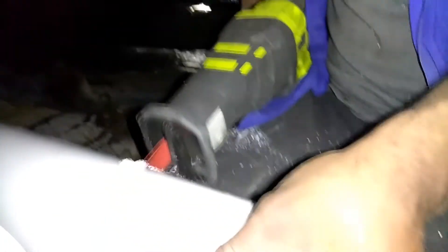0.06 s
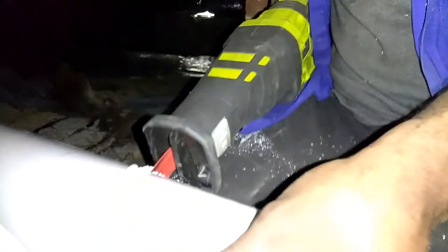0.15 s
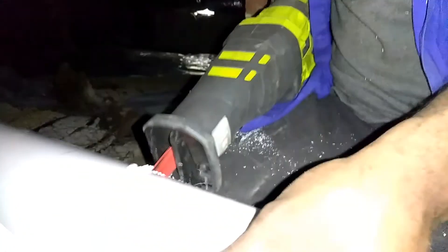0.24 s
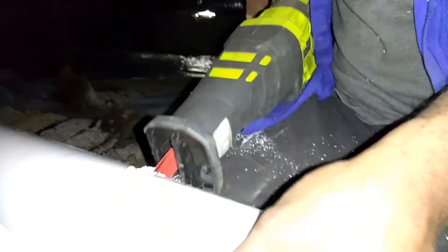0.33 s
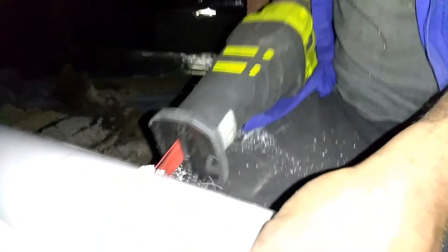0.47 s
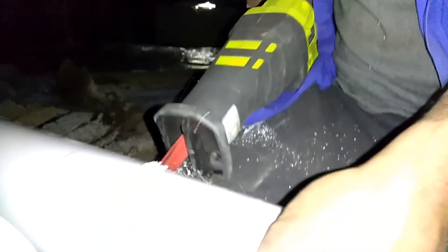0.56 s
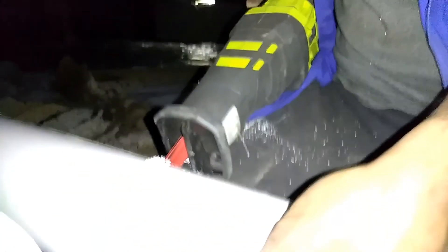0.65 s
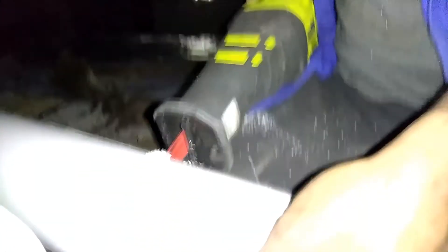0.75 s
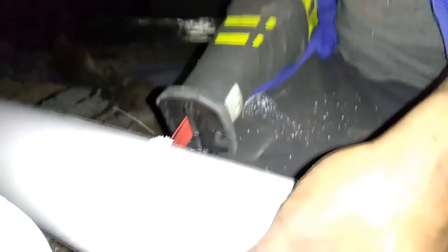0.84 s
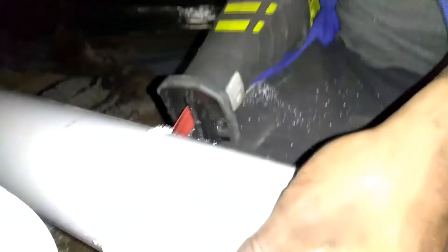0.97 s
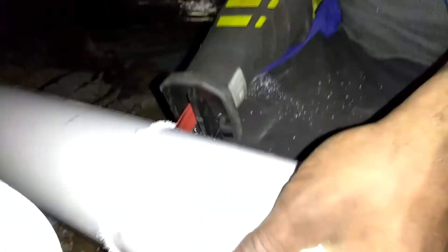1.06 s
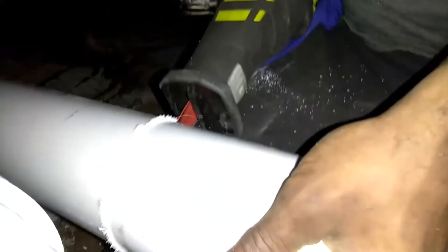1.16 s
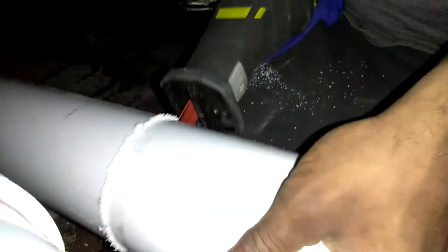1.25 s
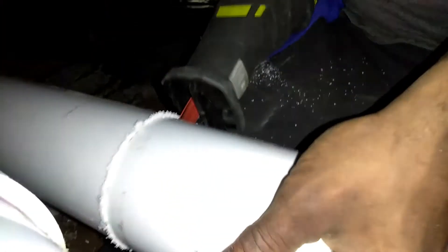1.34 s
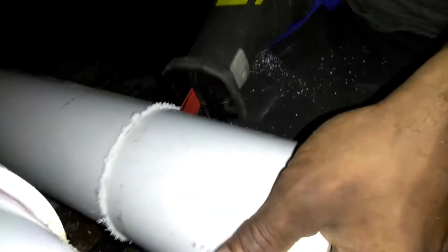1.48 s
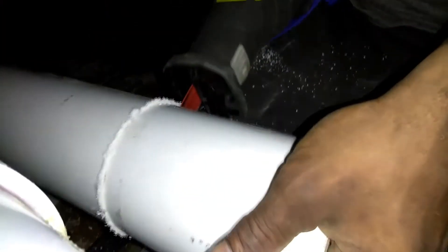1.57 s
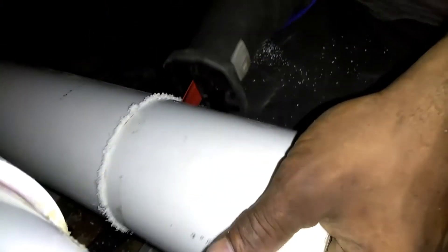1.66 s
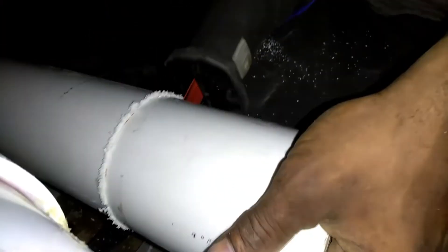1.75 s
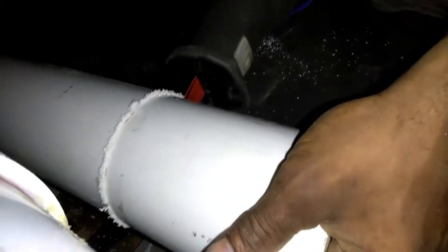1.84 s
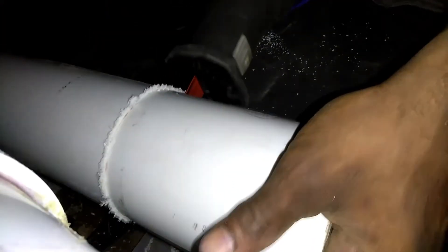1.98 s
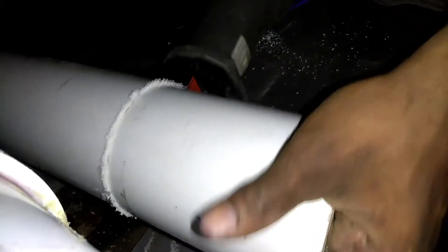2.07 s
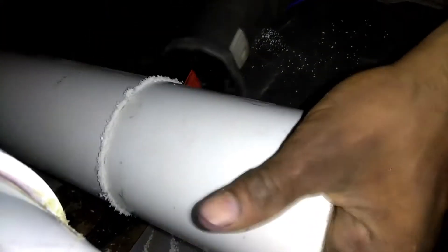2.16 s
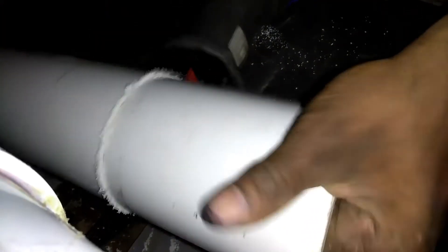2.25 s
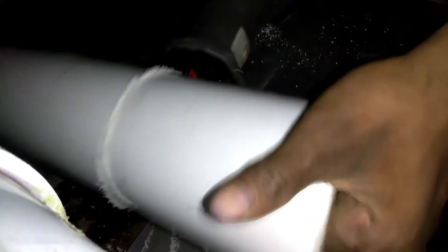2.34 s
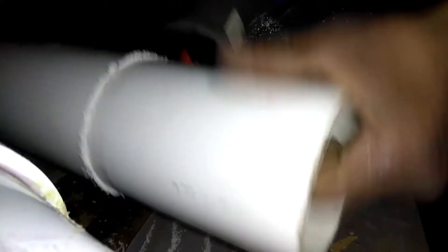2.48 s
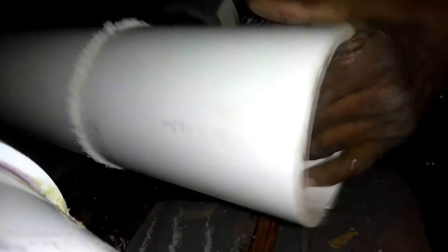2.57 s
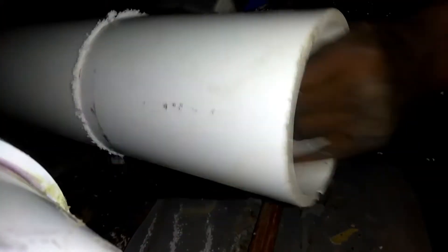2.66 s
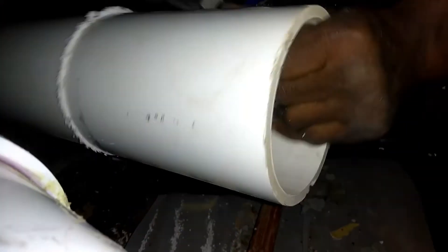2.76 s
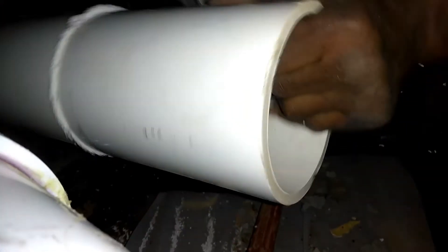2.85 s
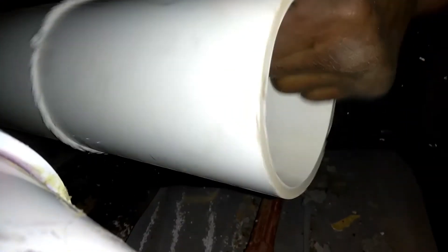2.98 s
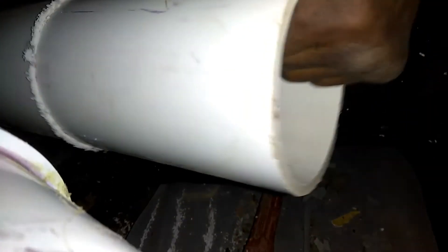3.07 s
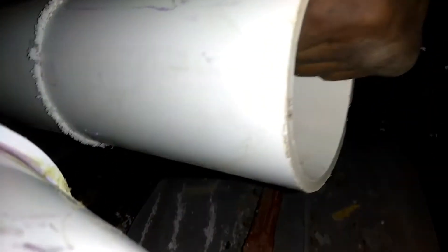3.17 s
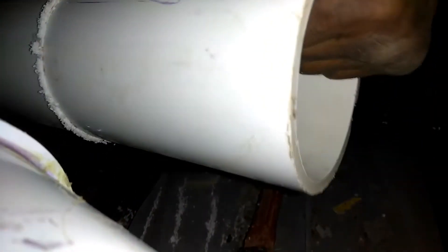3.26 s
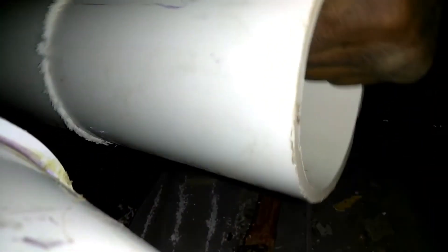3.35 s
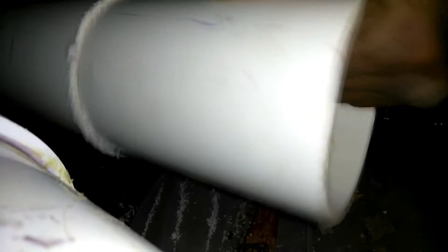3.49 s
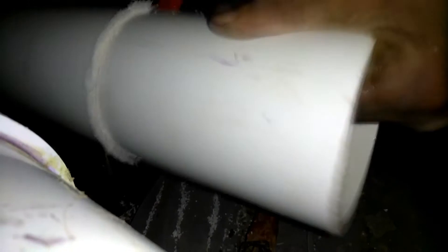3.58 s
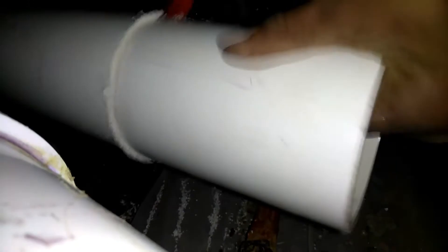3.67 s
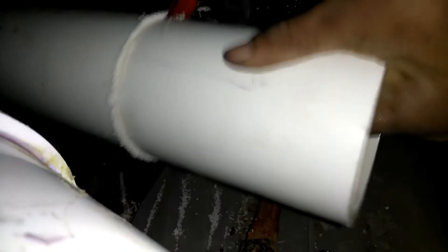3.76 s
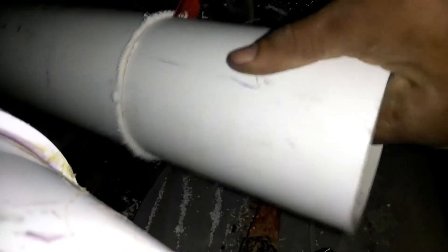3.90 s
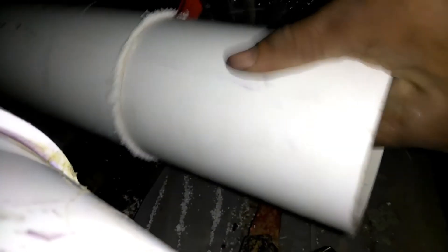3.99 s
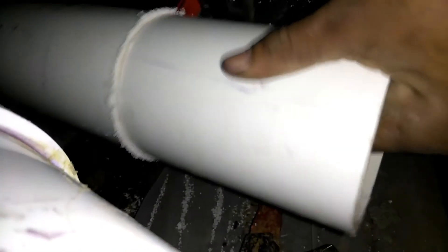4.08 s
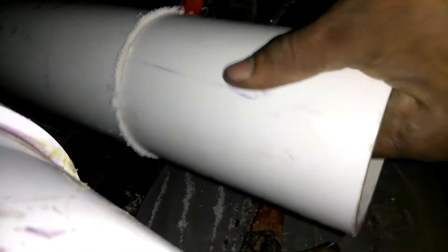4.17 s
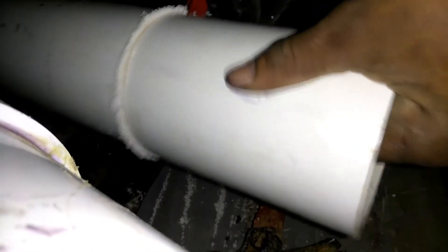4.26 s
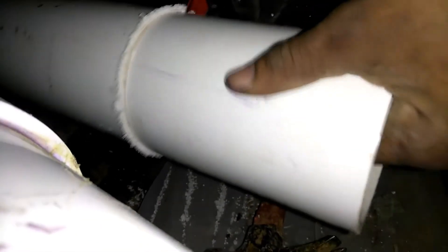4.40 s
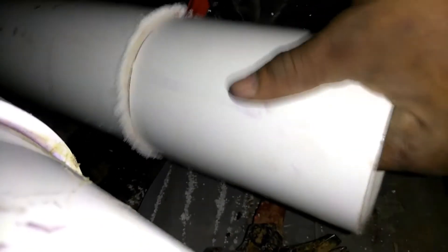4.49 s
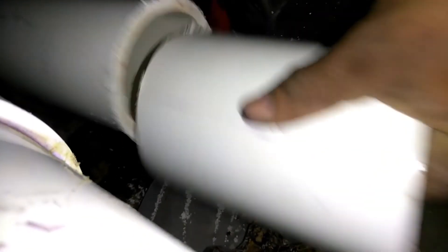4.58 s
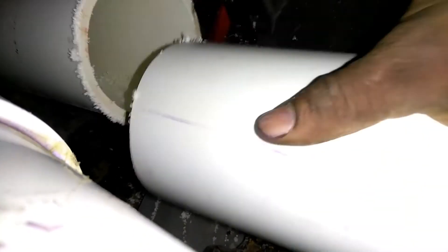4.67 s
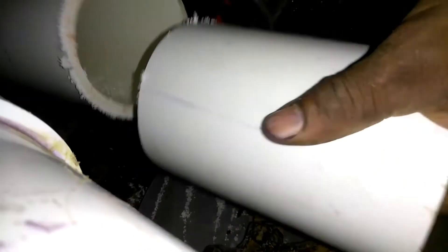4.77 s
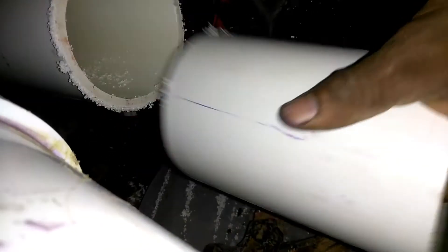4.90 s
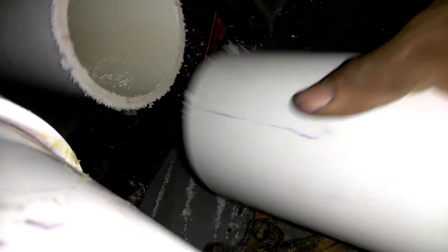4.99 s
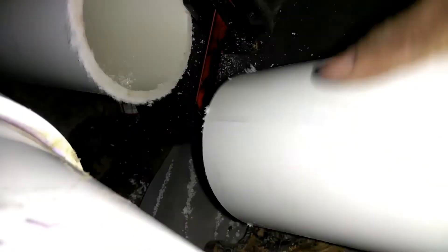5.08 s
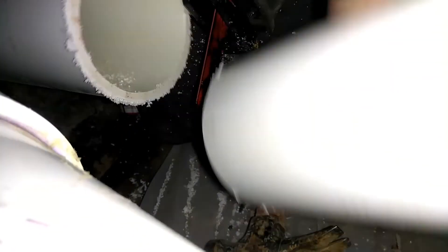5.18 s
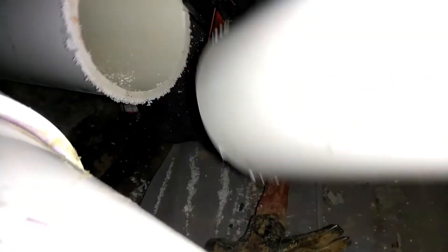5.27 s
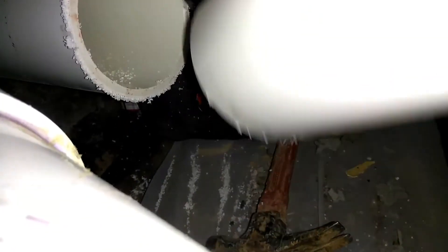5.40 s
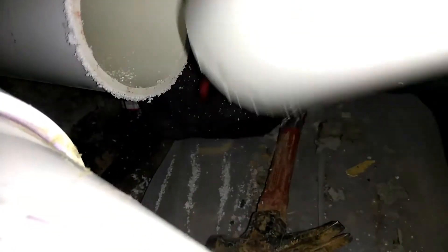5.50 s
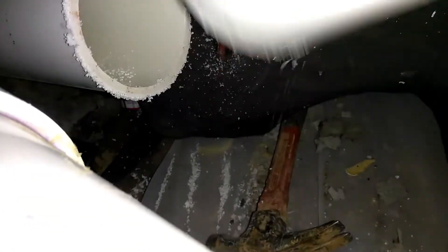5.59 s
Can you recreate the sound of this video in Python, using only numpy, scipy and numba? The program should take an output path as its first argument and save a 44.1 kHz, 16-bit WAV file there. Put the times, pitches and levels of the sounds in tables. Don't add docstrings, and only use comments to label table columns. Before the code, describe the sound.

From 0 s a reciprocating saw is already running at full power, right beside a phone microphone. Its teeth rasp rapidly, about 37 strokes a second, making the wide plastic pipe ring hollow in the low mids, while gears whine and flying chips hiss brightly, mostly on the left. Around 0.65 s the pipe thumps on its rest with a short falling squeal; from about 1 s the rasp eases and hiss and gears stand out. At 2.5 s the trigger is released and the motor stutters down with a few rough catches. Until 3.3 s a hand scuffs and sharply ticks the pipe, and the blade gives a small falling creak near 3.15 s. At 3.3 s the saw restarts abruptly with a squeal and thump, grinding harshly until two low bumps near 4.9 s and shutoff at 5 s. Faint rubs and ticks end it over dull, distant generator rumble.

```python
import sys
import numpy as np
from scipy import signal
from scipy.fft import rfft, irfft
from scipy.io import wavfile
from scipy.ndimage import uniform_filter1d
from numba import njit

SR = 44100
rng = np.random.default_rng(int(sys.argv[2]) if len(sys.argv) > 2 else 0)


def volts(x):
    e = np.asarray(x, float) / 20
    return 10 ** e


def wrap_up_sound(samples):
    columns = np.atleast_2d(samples).T
    tamed = np.clip(columns, -1, 1)
    steps = np.round(tamed * 32767).astype(np.int16)
    wavfile.write(sys.argv[1], SR, steps)


N = 248539
T = np.arange(N) / SR

# on t/s, off t/s, level/dB, coasting fall/(dB/s)
RUNS = [
    (-.1, 2.4784, 1, 165.5),
    (3.308, 4.997, 2, 127.5),
]
# t/s, rate/(strokes/s)
STROKE_RATE = [(0, 37.1), (.5, 37), (.65, 38.6), (.8, 37.6), (1.0, 37.25), (1.55, 37.2), (1.7, 38.2),
               (1.85, 38.5), (2.15, 39.6), (2.3, 33), (2.53, 33), (2.7, 13), (3.3, 15.6), (3.6, 33),
               (3.75, 36.2), (4.6, 36.2), (5.0, 37), (5.4, 24)]
# t/s, feed pressure/dB, blade grip on wall/dB, chip flow/dB, gear load/dB
FEED = [(0, -0.5, 2, -5, 1), (.26, 1, -0.5, -2.5, 1), (.6, -2, 2, -1.5, 1), (.82, 2, 0.5, -1, 2.5),
        (1.03, -9.5, -8, 3, 5), (1.27, -7, 1.5, 4, 5.5), (1.6, -7, 1, 3, 1.5), (1.97, -8, -0.5, 0.5, -4),
        (2.3, -5, -6.5, 2, -0.5), (2.6, -3, 4, -2, -2), (3.34, 4.5, -1.5, 1, -5.5),
        (3.48, -2, -11, -3, 0.5), (3.54, -2.5, 1, -1, 2), (3.95, 4, 1, 0.5, -0.5), (4.55, 2.5, 0, 1.5, 1.5),
        (4.66, -2, -5, 1.5, -0.5), (4.93, 0.5, -3.5, 2.5, -0.5), (5.05, 0.5, -7.5, -1.5, -0.5)]
# t/s, bite depth/(0-1), chip puffing/(0-1)
BITE = [(0, 0.2, .3), (.2, 0.42, .1), (.7, 0.4, .12), (1.3, 0.58, 0.3), (1.55, 0.43, .2), (1.7, 0.44, .5),
        (2.1, 0.37, .3), (2.3, .3, 0.4), (2.55, .25, 0.3), (3.3, .2, 0), (3.6, .3, 0.4), (4.0, .35, 0.4),
        (4.6, 0.21, .3), (5.0, .18, .2), (5.4, 0.2, .3)]
# t/s, jump level/dB, rise/s, fall/s
SNAGS = [(0.0, -0.5, .038, 0.044), (.69, 6, 0.046, 0.096), (1.52, 3.5, 0.051, 0.018),
         (1.7, 2.5, 0.05, 0.24), (2.212, 12, .025, 0.045), (2.267, 3.5, .012, .015),
         (2.34, 12, 0.029, 0.025), (2.4, 5.5, 0.01, .012), (2.425, 8, 0.0098, 0.019),
         (2.472, 1.5, .012, .012), (2.5, -1, .008, .01), (2.528, 8.5, .02, 0.02), (2.576, 7, .006, .01),
         (2.596, 14, .018, 0.042), (2.652, 9, 0.019, 0.019), (3.59, 2, 0.026, 0.035),
         (3.73, 6.5, 0.048, 0.042), (4.58, 1, .038, 0.029), (4.72, -3, .06, .06), (4.8, -11, 0.03, 0.028),
         (4.85, -3.5, .038, 0.017), (4.89, 4.5, .038, 0.085)]
# t/s, body left-right level/dB, hiss left-right level/dB
AIM = [(0, -0.5, 13.7), (.55, 0.5, 19.5), (.75, 0, 15.5), (1.5, -7, 18), (2.0, 3.5, 21), (2.4, -2, 17.4),
       (2.7, 6, 23), (3.05, 3, 22), (3.3, 1, 14), (3.7, -1, 16.3), (4.5, -1.5, 16), (4.8, 3.5, 19.7),
       (5.0, 4, 15), (5.6, 5.5, 24)]
# f/Hz, width/Hz, level/dB
PIPE_MODES = [(438, 88, -6.5), (577, 110, -0.5), (737, 160, -3), (915, 100, -7.5)]
# f/Hz, width/Hz, level/dB
RASP_MODES = [(1109, 40, -0.5), (1360, 460, 3), (1860, 490, 0), (2145, 110, 0.5), (2512, 360, 2),
              (3100, 840, 1)]
# f/Hz, width/Hz, level/dB
GEAR_MODES = [(4200, 1800, 2), (5097, 130, -1), (5805, 560, -3.5), (7000, 2300, -3.5)]
# f/Hz, width/Hz, level/dB
LEFT_PORT = [(8300, 3400, -12.5), (11310, 5700, 0), (11900, 1400, 6.5), (13270, 3100, 1.5)]
# f/Hz, width/Hz, level/dB
RIGHT_PORT = [(8200, 3800, 8.5), (9200, 1500, -12.5), (13300, 1100, 2), (15000, 1500, 1)]
# f/Hz, width/Hz, level/dB
GROUND_MODES = [(75, 67, 3), (117.4, 49, 2.5), (157.4, 39, 1.5), (214, 110, -10)]
# t/s, hold/s, level/dB
UPPER_LOCKS = [(.15, 0.29, -23.5), (.56, 0.036, -23), (.77, 0.02, -23), (1.18, 0.19, -35),
               (1.54, 0.0096, -26.5), (1.88, 0.0093, -25.5), (2.05, 0.49, -33), (3.69, 0.04, -21.5),
               (3.88, 0.24, -25), (4.3, 0.18, -26.5), (4.58, 0.0097, -24.5)]
# t/s, hold/s, level/dB
LOWER_LOCKS = [(0.0, 0.0091, -24), (.48, 0.011, -24.5), (.72, 0.0067, -28), (.95, 0.17, -29.5),
               (1.24, 0.014, -33), (1.43, 0.061, -27.5), (1.71, 0.0064, -25.5), (2.12, 0.0066, -27),
               (3.52, 0.01, -34.5), (3.8, 0.46, -27), (4.38, 0.14, -29), (4.59, 0.009, -28)]
# t/s, upper f/Hz, upper level/dB, lower level/dB
WHINE = [(0, 4500, -12.5, -19), (.1, 4770, -1, -8), (.34, 4380, -2.5, -4.5), (.6, 3950, -6, -7.5),
         (.7, 4200, -14, -15.5), (.95, 4080, -1.5, -17), (1.18, 4100, -6.5, -13.5), (1.6, 4350, -4.5, -22),
         (2.3, 4200, -21, -22), (3.5, 4240, -28.5, -23.5), (4.0, 4410, -12.5, -16), (4.55, 4350, -6, -19.5),
         (4.7, 4380, -26, -7.5), (5.1, 4400, -23, -14.5)]
# t/s, level/dB
CLAMP = [(0, -45), (.15, -31), (.45, -28), (.7, -30), (.85, -42), (2.3, -48), (2.5, -90), (5.7, -90)]
# t/s, peak level/dB
BOUNCES = [(.12, -26), (.25, -28.5), (.66, -22.5), (.77, -24.5), (.91, -33), (1.15, -34.5), (1.34, -34.5),
           (1.55, -36), (2.04, -38), (2.21, -30.5), (2.34, -33.5), (2.42, -28), (3.315, -22), (3.45, -33.5),
           (3.68, -27.5), (3.87, -33), (4.2, -37), (4.52, -30.5), (4.875, -25), (4.98, -31.5),
           (5.27, -48.5)]
# t/s, hold/s, f/Hz, level/dB
SINGS = [(.02, 0.069, 1360, -28), (0.17, 0.24, 1780, -27), (.36, .3, 1000, -30), (.1, 0.41, 2590, -30.5),
         (.57, 0.035, 1770, -26), (.78, 0.071, 1200, -25.5), (.69, .04, 1520, -25.5),
         (1.2, .15, 890, -34.5), (1.62, 0.05, 1000, -32), (1.4, .1, 760, -29), (1.5, 0.023, 1000, -22),
         (3.6, 0.4, 2050, -27), (3.58, 0.14, 620, -24.5), (4.1, 0.49, 2210, -33), (3.9, .2, 1300, -30.5),
         (3.6, 0.5, 3400, -29.5), (4.55, 0.18, 5600, -32), (0.081, 0.14, 4760, -22.5)]
# t/s, level/dB
WHISTLE = [(0, -30), (.5, -27), (.95, -30), (1.3, -39.5), (2.4, -43), (2.6, -80), (3.3, -80), (3.4, -39.5),
           (4.2, -35), (5.0, -40.5), (5.2, -80)]
# f/Hz, level/dB
HUM = [(59.2, -47.5), (91.5, -54.5), (183.0, -65), (242.2, -64.5), (279.9, -74.5)]
# f/Hz, density/(dB/Hz)
NIGHT_SPECTRUM = [(26, -26.5), (45, -3.5), (125, -6), (186, -25), (346, -24.5), (422, -30), (2080, -40.5),
                  (4730, -50), (9000, -31), (11700, -80.5), (19800, -120)]
# t/s, hold/s, start f/Hz, end f/Hz, level/dB
BINDS = [
    (0.145, 0.21, 1800, 1750, -33.5),
    (0.663, 0.072, 2110, 1890, -21),
    (3.303, 0.12, 2300, 1900, -17.5),
    (3.752, 0.86, 2130, 2100, -28),
    (4.667, 0.41, 1470, 1450, -31.5),
]
# t/s, peak level/dB
THUMPS = [
    (0.656, -11.5),
    (3.307, -13),
    (4.869, -12.5),
    (4.901, -19),
]
# t/s, peak level/dB, body level re peak/dB, ring T60/s
TICKS = [(2.609, -17.5, -15.5, 0.01), (2.642, -29, -12, 0.025), (2.716, -56, 8, 0.028),
         (2.7415, -32.5, -21, 0.015), (2.7787, -48, -27, 0.017), (2.8351, -45, -14, 0.0078),
         (2.891, -41, -19, 0.0088), (2.8977, -34.5, -18, .01), (2.9036, -26, -21, 0.014),
         (2.9075, -26.5, -18, .03), (2.946, -25.5, -16, 0.015), (2.965, -36, -25, .009),
         (2.98, -39, -26, .008), (2.9869, -28, -18, 0.014), (3.0163, -29, -21, 0.012),
         (3.026, -32, -26, 0.013), (3.052, -36, -27, .008), (3.0584, -18, -32, 0.006),
         (3.0868, -42, -20, .01), (3.099, -36.5, -31, 0.009), (3.1397, -43, -22, .01),
         (3.1737, -42, 0, 0.02), (3.2, -31, 3.5, 0.014), (3.206, -16.5, -9, 0.021),
         (3.235, -34, -12, 0.013), (3.2975, -51.5, 10.5, 0.012), (3.305, -29, -1, 0.0077),
         (5.202, -36, -25, .01), (5.2525, -40, -20, .012), (5.2803, -37, -14, 0.014),
         (5.3133, -42, -21, 0.011), (5.3428, -35, -24, 0.011), (5.409, -50.5, -21, .01),
         (5.426, -51.5, -19.5, .01), (5.4635, -52, -21, 0.0096), (5.474, -51, -20, .01),
         (5.523, -42, -28, 0.012), (5.538, -43, -25, .01), (5.546, -41, -25, .012),
         (5.5764, -31, -24, 0.01)]
# f/Hz, width/Hz, level/dB
KNUCKLE_MODES = [(1150, 500, -9), (1690, 350, -5), (2220, 450, -1), (3300, 440, -1), (3760, 500, 2),
                 (4600, 500, -8.5)]
# t/s, hold/s, bright level/dB, dull level/dB
SCUFFS = [
    (2.683, 0.073, -47, -52.5),
    (2.778, 0.078, -50, -71),
    (2.908, 0.0052, -34.5, -41.5),
    (2.925, .14, -39.5, -56),
    (3.09, 0.061, -46.5, -64),
    (3.168, 0.027, -41, -34),
    (3.225, 0.056, -44.5, -52),
    (5.298, 0.18, -59, -67.5),
    (5.47, 0.036, -57, -68),
    (5.526, 0.087, -47, -63.5),
]
# f/Hz, width/Hz, level/dB
CREAK_MODES = [(500, 400, -14.5), (1000, 610, -8), (2000, 750, 3), (3800, 1300, -6)]


def unit(x):
    return x / np.sqrt(np.mean(x ** 2))


def read(table):
    s, *columns = np.transpose(table)
    return [np.interp(T, s, column) for column in columns]


def walk(rate_hz):
    k = int(SR / rate_hz)
    steps = np.repeat(rng.standard_normal(N // k + 1), k)
    return unit(uniform_filter1d(uniform_filter1d(steps, k), k)[:N])


def grit(spread_db):
    return unit(rng.standard_normal(N) * volts(spread_db * rng.exponential(size=N)))


@njit
def svf(x, hz, width):
    y, b, l = np.empty(len(x)), 0., 0.
    for i in range(len(x)):
        g, k = np.tan(np.pi * hz[i] / SR), width / hz[i]
        v = (b + g * (x[i] - l)) / (1 + g * (g + k))
        b, l, y[i] = 2 * v - b, l + 2 * g * v, k * v
    return y


def svf_twice(x, hz, width_hz):
    return unit(svf(svf(x, hz, width_hz), hz, width_hz))


def peak(x, hz, width_hz):
    return signal.lfilter(*signal.iirpeak(hz, hz / width_hz, SR), x)


def band(x, lo_hz, hi_hz):
    return signal.sosfilt(signal.butter(4, [lo_hz, hi_hz], "band", fs=SR, output="sos"), x)


def body(x, modes, drift, patchy_db):
    out = np.zeros(N)
    for hz, width_hz, db in modes:
        centre_hz = hz * (1 + drift * walk(2.843))
        out += volts(db + patchy_db * walk(9)) * svf(x, centre_hz, 1. * width_hz)
    return unit(out)


def ports(make, opposed, pan_db):
    share = np.clip(opposed, 0, .98)
    left = make(0.89)
    right = np.sqrt(1 - share ** 2) * make(0) - share * left
    a, b = volts(pan_db / 2), volts(-pan_db / 2)
    return np.array([a * left, b * right]) * 2 / np.sqrt(a * a + b * b - 2 * a * b * share)


def shape_db(s, hold_s, rise_db_per_s, fall_db_per_s):
    return np.minimum(0, np.minimum((T - s) * rise_db_per_s, (s + hold_s - T) * fall_db_per_s))


def summed_db(levels_db):
    return 10 * np.log10(sum(volts(2 * db) for db in levels_db) + 1e-12)


def power_db():
    start_db_per_s = 6998
    runs = [db + shape_db(on, off - on, start_db_per_s, coast) for on, off, db, coast in RUNS]
    return np.max(runs, axis=0)


def levels():
    power = power_db()
    pressure, grip, flow, load = read(FEED)
    snag = np.zeros(N)
    for s, db, rise_s, fall_s in SNAGS:
        snag += db * np.clip(np.minimum(1 + (T - s) / rise_s, 1 - (T - s) / fall_s), 0, 1)
    coasting = np.clip(-power / 10, 0, 1)

    def answer(level_db, feed_share, snag_share, coast_share):
        share = snag_share + (coast_share - snag_share) * coasting
        return power + level_db + feed_share * pressure + share * snag

    ring = [answer(-23, 0.28, 0.81, 1.04) + grip]
    rasp = [answer(-20, 0.9, 1.13, 1.25)]
    gear = [answer(-20, 0.81, 0.43, 0.97) + load]
    late_db = sum(-11 * np.exp(-np.abs(T - on) / 0.027) for on, *_ in RUNS)
    hiss = [answer(-12, 0.32, 0.6, 1) + late_db + flow]
    for s, hold_s, bright_db, dull_db in SCUFFS:
        rub = shape_db(s, hold_s, 995, 447.5)
        ring.append(rub - 29.5 + 0.46 * dull_db)
        rasp.append(rub + dull_db)
        gear.append(rub + (bright_db + dull_db) / 2 - 7)
        hiss.append(rub + bright_db)
    shake = power - 43.5 + 4 * grip
    jolt = [shake] + [db + shape_db(s, 0, 795.5, 118.5) for s, db in BOUNCES]
    return [summed_db(parts) for parts in (ring, rasp, gear, hiss, jolt)]


def crank():
    rate, = read(STROKE_RATE)
    even, _ = read(BITE)
    turn = 2 * np.pi * np.cumsum(rate * (1 + 0.002 * walk(6))) / SR + 2.9
    reversals = np.diff(np.floor(turn / 2 / np.pi), prepend=0)
    knock = even * (rate > 34) * unit(reversals * volts(4.5 * walk(40)))
    return turn, even, knock


def pipe_ring(gate, knock, pan_db):
    def make(own):
        teeth = grit(2.72) * gate(6.3, 2.7, 0.) + 1.3 * own * knock
        return unit(band(body(teeth, PIPE_MODES, 0.0073, 1.8), 264, 1063))
    return ports(make, 0.75, pan_db)


def wall_tones(gate, knock):
    sway = 1 + .005 * np.sin(2 * np.pi * 2.3 * T + 0.98)
    out = np.zeros((2, N))
    for table, hz, width_hz in ((UPPER_LOCKS, 643, 17.), (LOWER_LOCKS, 485, 95.)):
        def make(own):
            teeth = grit(0.) * gate(19.4, 1.9, 0.) + 2.6 * own * knock
            return unit(svf(teeth, hz * sway, width_hz))
        lock_db = summed_db([db + shape_db(s, hold_s, 99.5, 134) for s, hold_s, db in table])
        out += volts(lock_db - 1.5) * ports(make, 0.87, -4 + 0 * T)
    return out


def tooth_rasp(gate, knock, pan_db):
    def make(own):
        teeth = grit(1.5) * gate(4.5, 0.5, 0.19) + 0.56 * own * knock
        return unit(band(body(teeth, RASP_MODES, 0.029, 2.6), 880, 3510))
    return ports(make, 0.11, 0.74 * pan_db + 2.0)


def gear_whine(gate, pan_db):
    def make(own):
        return unit(band(body(grit(1.7) * gate(3.6, 1.2, 0.2), GEAR_MODES, 0.025, 2.6), 3570, 6860))
    gears = ports(make, 0.083, .5 * pan_db - .4)
    upper_hz, upper_db, lower_db = read(WHINE)
    burst = grit(0.) * gate(15., 7., .6)
    upper = volts(upper_db) * svf_twice(burst, upper_hz, 600.)
    lower = volts(lower_db) * svf_twice(burst, 3026 + 0. * T, 190.)
    return gears + (upper + lower) * np.array([[.6], [1.4]])


def clamp_chirp(gate):
    hz, width_hz = 10650, 380
    burst = grit(0.) * gate(15., 7., .6)
    chirp = unit(peak(peak(burst, hz, width_hz), hz, width_hz))
    return volts(read(CLAMP)[0]) * chirp * np.array([[1.6], [.4]])


def chip_hiss(turn):
    _, puffs = read(BITE)
    _, hiss_pan_db = read(AIM)
    chips = volts(puffs * (5.5 * np.cos(turn - .65) + 3.4 * np.cos(2 * turn - 1.3)))
    left, right = [unit(band(body(grit(1.5) * chips, port, .006, 1.9), 6750, 16000))
                   for port in (LEFT_PORT, RIGHT_PORT)]
    return np.array([1.596 * left, 3.5 * volts(-uniform_filter1d(hiss_pan_db, size=SR // 6)) * right])


def rest_jolts(knock):
    def make(own):
        return unit(band(body(grit(0.) + 2.4 * own * knock, GROUND_MODES, 0.015, 1.1), 40, 336))
    return ports(make, 0.8, -3 + 0 * T)


def steel_sings(gate):
    edge_s, width_hz = 0.044, 24
    out, teeth = np.zeros(N), grit(0.) * gate(5.1, 2., .1)
    for s, hold_s, hz, db in SINGS:
        span = slice(max(int((s - edge_s) * SR), 0), int((s + hold_s + edge_s) * SR))
        edge = np.clip(np.minimum(T[span] - s, s + hold_s - T[span]) / edge_s + 1, 0, 1)
        out[span] += volts(db) * edge * unit(peak(teeth[span], hz, width_hz))
    return out * np.array([[.8], [1.2]])


def saw():
    ring_db, rasp_db, gear_db, hiss_db, jolt_db = levels()
    pan_db, _ = read(AIM)
    turn, even, knock = crank()

    def gate(pull_db, both_db, lag_rad):
        return volts(even * (pull_db * np.cos(turn - lag_rad) + both_db * np.cos(2 * turn - 2 * lag_rad)))

    out = volts(ring_db - 4.0) * pipe_ring(gate, knock, pan_db)
    out += wall_tones(gate, knock)
    out += volts(jolt_db) * rest_jolts(knock)
    out += volts(rasp_db) * tooth_rasp(gate, knock, pan_db)
    out += volts(gear_db) * gear_whine(gate, pan_db)
    out += volts(hiss_db) * chip_hiss(turn)
    return out + clamp_chirp(gate) + steel_sings(gate)


def whistle():
    centre_hz = 14250 * (1 + .006 * walk(3))
    level = volts(read(WHISTLE)[0] + 2.2 * walk(9.9))
    return level * svf_twice(grit(1.2), centre_hz, 1100.) * np.array([[1.5], [.4]])


def night():
    hum = np.zeros(N)
    for hz, db in HUM:
        phase = 2 * np.pi * hz * np.cumsum(1 + .01 * walk(2.9)) / SR
        hum += volts(db + 2.0 * walk(21)) * np.sqrt(2) * np.sin(phase)
    hz, db = np.transpose(NIGHT_SPECTRUM)
    bin_hz = np.arange(N // 2 + 1) * SR / N
    shape = volts(np.interp(np.log(bin_hz + 1), np.log(hz), db))
    rumble = ports(lambda own: unit(irfft(rfft(rng.standard_normal(N)) * shape, N)), 0.23, 3.0 + 0 * T)
    return hum * np.array([[4.2], [-2.3]]) + volts(-50.5) * rumble


def bind():
    knots_s = np.ravel([(s, s + hold_s) for s, hold_s, *_ in BINDS])
    centre_hz = np.interp(T, knots_s, np.ravel([row[2:4] for row in BINDS]))
    db = summed_db([db + shape_db(s, hold_s, 5002, 205 * (0.29 + 0.096 / hold_s))
                    for s, hold_s, _, _, db in BINDS])
    return volts(db) * ports(lambda own: svf_twice(grit(1.6), centre_hz, 1300.), 0.17, 0 * T)


def thumps():
    out = np.zeros(N)
    for s, db in THUMPS:
        age = np.clip(T - s, 0, None)
        for hz, width_hz, mode_db in GROUND_MODES[1:3]:
            fall = np.exp(-np.pi * .3 * width_hz * age)
            out += volts(db + mode_db) * fall * np.sin(2 * np.pi * hz * age)
    return out * np.array([[.75], [-1.1]])


def ticks():
    front_db = 12.5
    bright, dull = np.zeros(N), np.zeros(N)
    rough = np.sign(rng.standard_normal(N))
    for s, db, body_db, ring_s in TICKS:
        span = slice(int(s * SR), int(s * SR) + SR // 10)
        fall = np.exp(-np.log(1000) * (T[span] - s) / max(ring_s, .002)) * rough[span]
        bright[span] += volts(db) * fall
        dull[span] += volts(db + body_db) * fall
        dull[span.start] += volts(db + body_db + front_db)

    def ring(x, modes):
        return sum(volts(db) * peak(x, hz, width_hz) for hz, width_hz, db in modes)

    bright = band(bright, 7400, 15000)
    wall = ring(dull, KNUCKLE_MODES)
    left = 2.0 * ring(bright, LEFT_PORT) + 7.0 * wall
    right = 0.12 * ring(bright, RIGHT_PORT) + 6.2 * np.roll(wall, shift=20)
    return np.array([left, right])


def creak():
    start_s, length_s, from_hz, to_hz = 3.15, 0.046, 560, 384
    along = np.clip((T - start_s) / length_s, 0, 1)
    cycle = 2 * np.pi * np.cumsum(from_hz + (to_hz - from_hz) * along) / SR
    slips = sum(np.cos(k * cycle) for k in range(1, 13)) * volts(2.5 * walk(300))
    swell = np.interp(along, [0, .1, .4, 0.67, .9, 1], [0.0015, 0.2, 0.49, 1.0, 0.37, 0.0012])
    steel = unit(sum(volts(db) * peak(peak(slips, hz, 1.3 * width_hz), hz, 1.3 * width_hz)
                     for hz, width_hz, db in CREAK_MODES))
    tap_s, tap_hz, tap_db, tap_t60_s = 3.207, 2190, -33, 0.091
    age = np.clip(T - tap_s, 0, None)
    tap = volts(tap_db - 60 * age / tap_t60_s) * np.sin(2 * np.pi * tap_hz * age)
    return (volts(-25.5) * swell * steel + tap) * np.array([[1.1], [.9]])


def scene():
    duck_db = -8 * np.clip(-0.5 + power_db() / 20, 0, 1)
    return saw() + whistle() + night() * volts(duck_db) + bind() + thumps() + ticks() + creak()


def low_pass(x):
    return signal.sosfilt(signal.butter(12, 15620, fs=SR, output="sos"), x)


def record(dry):
    loud = volts(0.84) * signal.lfilter(*signal.butter(3, 36, "high", fs=SR), dry)
    rounded = loud / (1 + np.abs(loud) ** 4) ** 0.31
    return low_pass(rounded)


dry = scene()
out = record(dry)
wrap_up_sound(out)
```